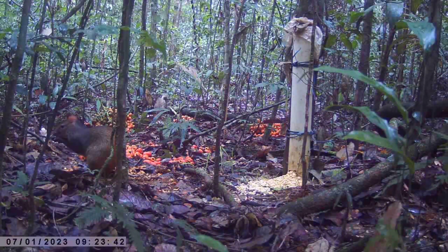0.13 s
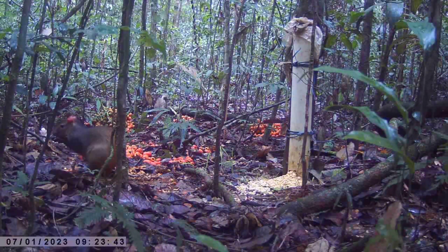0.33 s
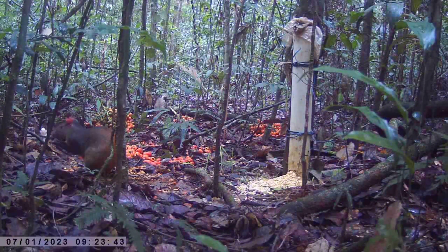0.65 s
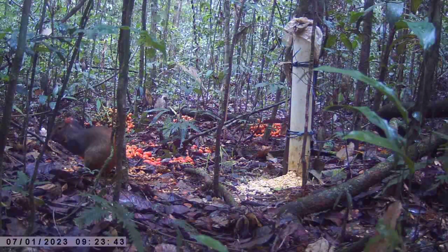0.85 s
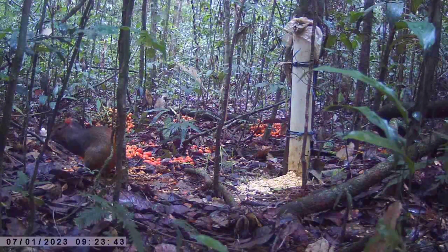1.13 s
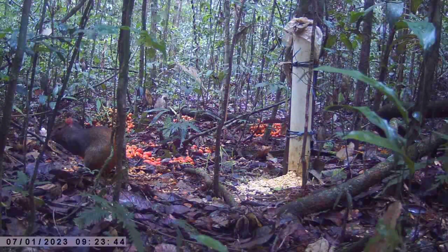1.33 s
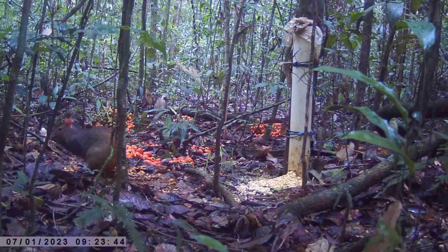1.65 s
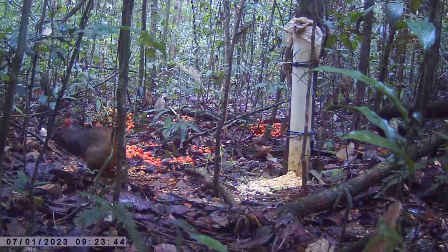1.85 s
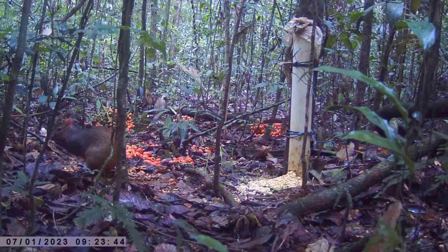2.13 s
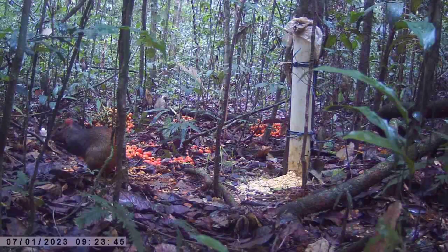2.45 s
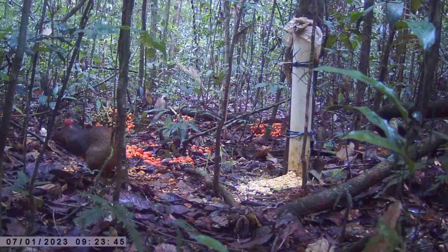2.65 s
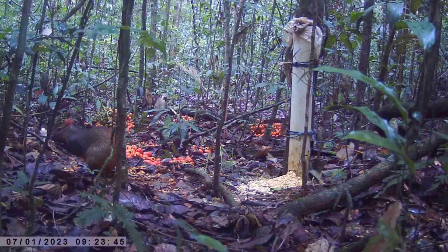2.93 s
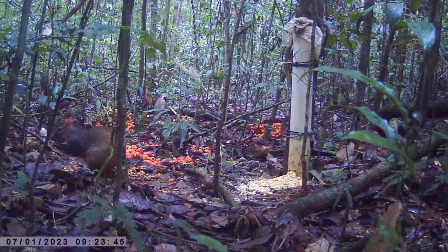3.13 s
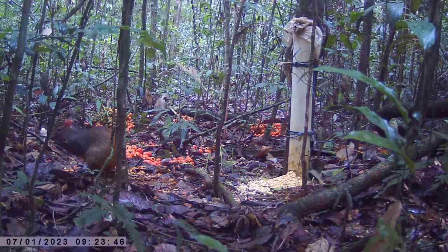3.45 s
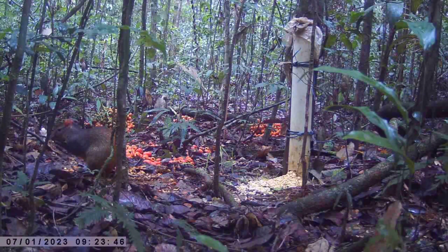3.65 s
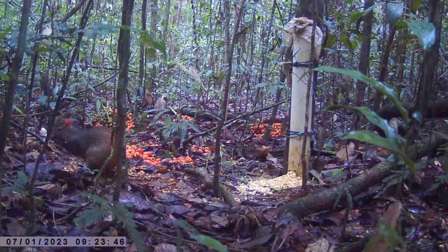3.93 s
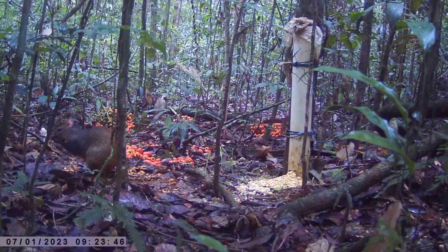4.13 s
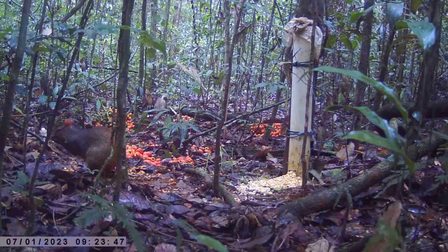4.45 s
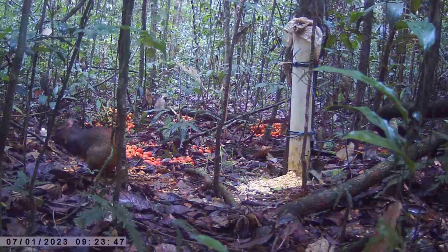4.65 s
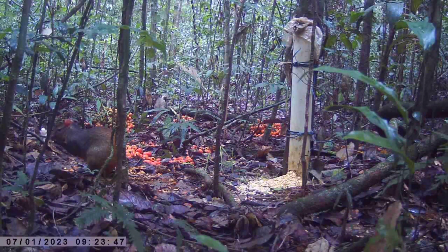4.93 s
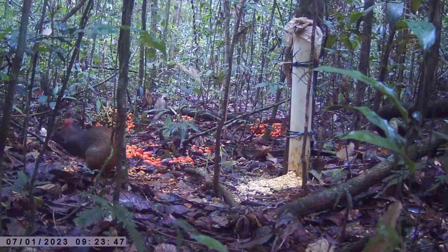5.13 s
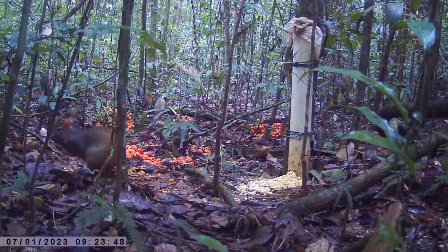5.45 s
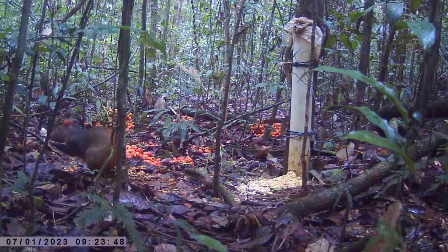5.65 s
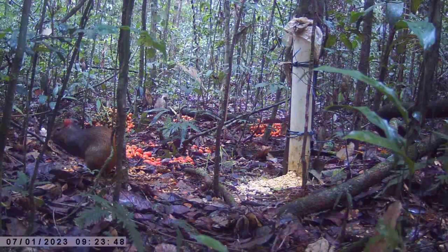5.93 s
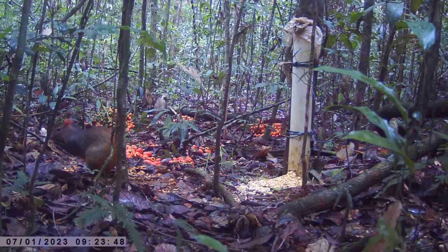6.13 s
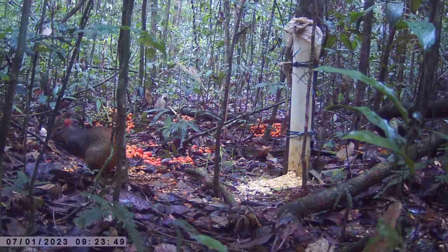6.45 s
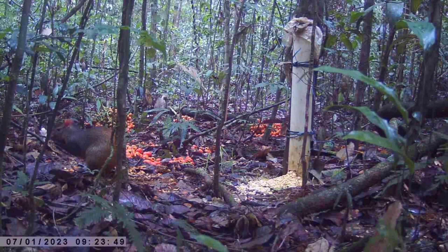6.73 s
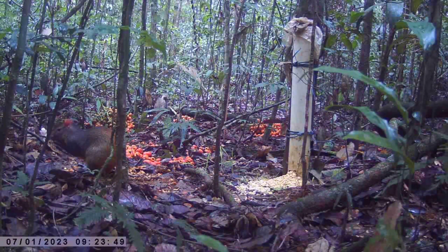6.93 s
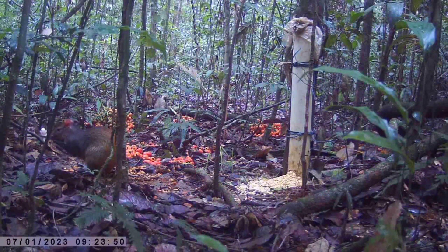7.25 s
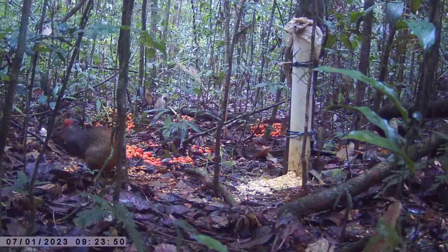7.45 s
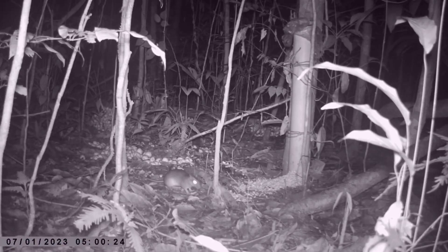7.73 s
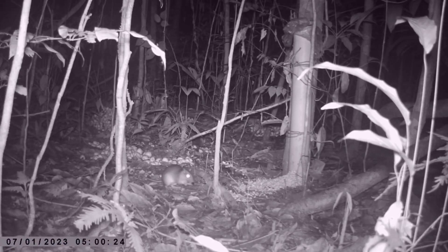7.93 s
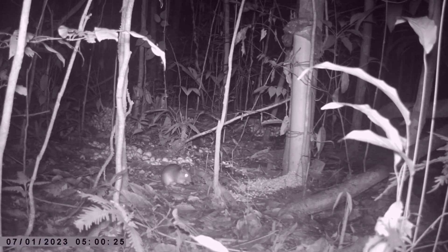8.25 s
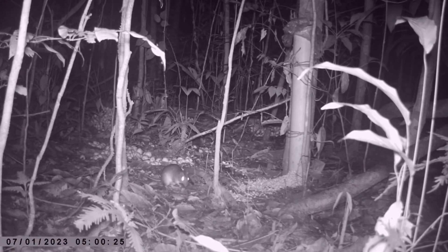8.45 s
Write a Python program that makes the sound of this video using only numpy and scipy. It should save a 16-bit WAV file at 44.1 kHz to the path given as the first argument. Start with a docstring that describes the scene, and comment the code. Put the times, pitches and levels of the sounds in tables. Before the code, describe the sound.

A close cricket chirps in a high, even pulse, about three times a second, on a rainforest floor. Behind it, birds give echoing whistles that rise and plunge, drops tick on dead leaves, and distant insects shimmer over a faint hiss. Near the end the microphone clicks with a soft thump, and the sound cuts to a quieter night trill with one cricket pipping.

```python
"""A near cricket chirps three times a second on a rainforest floor, scraping one wing along the other.
Birds sweep long whistles through the echoing trees, drops tick on dead leaves, and far insects merge
into a chorus over a faint hiss of air. Then night cuts in: the microphone starts with a soft thump,
and a steady insect trill surrounds one pulsing cricket. Both channels are alike."""
import sys
import numpy as np
from scipy import signal
from scipy.fft import rfft, irfft, next_fast_len
from scipy.io import wavfile
from scipy.ndimage import uniform_filter1d

SR = 44100
rng = np.random.default_rng(int(sys.argv[2]) if len(sys.argv) > 2 else 0)


def dump_mix(stems):
    """Bounce the given channels to the path in sys.argv[1] as a 16-bit WAV at rate SR."""
    frames = np.atleast_2d(stems).T  # one column per channel
    limited = np.clip(frames, -1, 1)  # hard clip at full scale
    pcm = np.round(limited * 32767).astype(np.int16)
    wavfile.write(sys.argv[1], SR, pcm)


N = 379337
TIME = np.arange(N) / SR
NIGHT_S = 7.618


def near_cricket(level_db=-30.5, uneven_db=.55, octave_db=-31.5, chirp_gap_s=.3092, stroke_gap_s=.02385):
    """Stridulation: in each wing stroke a scraper slows along a file, so the tone falls."""
    # one stroke: t/ms from its peak, f/Hz, relative amplitude
    stroke = [(-7, 7100, 0), (-5.4, 6920, .42), (-3, 6700, .46), (-1.2, 6590, .78), (.3, 6450, 1),
              (1.5, 6320, .6), (2.2, 6240, .52), (3.5, 6200, 0)]
    # runs in strict time: t/s of the first peak, chirps, strokes per chirp
    runs = [(.005, 4, 6), (1.265, 1, 6), (1.598, 1, 6), (1.929, 7, 6), (4.117, 2, 5), (4.735, 3, 6),
            (5.687, 1, 6), (6.021, 1, 5), (6.330, 5, 6)]
    ms, hz, height = np.transpose(stroke)
    peaks = [s + chirp * chirp_gap_s + k * stroke_gap_s + (k > 0) * .001   # first gap 1 ms longer
             for s, chirps, strokes in runs for chirp in range(chirps) for k in range(strokes)]
    t_ms = np.arange(ms[0], ms[-1], 1000 / SR)
    pitch, envelope = np.full(N, hz[0]), np.zeros(N)
    for s, (late, loud, sharp) in zip(peaks, rng.standard_normal((len(peaks), 3))):
        start = round((s + ms[0] / 1000 + late * .0002) * SR)
        at = np.clip(start + np.arange(len(t_ms)), 0, N - 1)
        pitch[at] = np.interp(t_ms, ms, hz) * (1 + .003 * sharp)
        envelope[at] = np.interp(t_ms, ms, height) * from_db(level_db + uneven_db * loud)
    song = envelope * (tone(pitch) + from_db(octave_db) * tone(2 * pitch))
    return song + from_db(-18) * forest(song, t60=.2)


def sweep(length, low_hz, top_hz, fade_db, half_s, power, edge_s):
    """Frequency glide: pitch and envelope, halfway up after half_s and fading towards the top."""
    t = np.arange(int(length * SR)) / SR
    height = t ** power / (t ** power + half_s ** power)
    edges = np.clip(np.minimum(t, length - t) / edge_s, 0, 1) ** 2
    return low_hz + (top_hz - low_hz) * height, edges * from_db(-fade_db * height ** 4)


def whistles(creep_hz_per_s=1700):
    """Frequency modulation: yields each bird call as (start t/s, level/dB, pitch, envelope)."""
    # shooting up, then creeping higher: start t/s, length/s, top f/Hz before creep, level/dB, fade/dB
    rises = [(1.201, .125, 4240, -47.5, 20), (1.727, .36, 4620, -49, 11), (1.779, 0.14, 4070, -47.5, 42),
             (4.537, .1, 3730, -64, 22), (5.119, .06, 2910, -69, 25)]
    # tipping over and plunging: end t/s, length/s, top f/Hz, level/dB, fade/dB
    falls = [(2.251, .19, 4950, -45.5, 29), (2.729, .34, 5480, -48.5, 18), (5.582, .07, 4800, -66, 19)]
    # soft notes that swell once: middle t/s, length/s, first f/Hz, last f/Hz, level/dB
    notes = [(0.399, 0.121, 1565, 1533, -66.5), (.42, .12, 1230, 1087, -74), (0.622, 0.13, 1012, 977, -80),
             (0.719, 0.084, 1598, 1554, -68.5), (1.349, .11, 1340, 1210, -71),
             (1.554, 0.13, 1150, 1072, -73.5), (2.257, 0.037, 1773, 1643, -53),
             (2.413, .11, 1620, 1630, -52.5), (2.744, .05, 1800, 1700, -54.5), (2.96, .16, 1695, 1661, -61),
             (4.323, .3, 1626, 1578, -80.5), (5.78, 0.11, 1695, 1606, -69)]
    for s, length, top_hz, db, fade_db in rises:
        pitch, envelope = sweep(length, 1430, top_hz, fade_db, half_s=.039, power=2.4, edge_s=.022)
        yield s, db, pitch + creep_hz_per_s * np.arange(len(pitch)) / SR, envelope
    for s, length, top_hz, db, fade_db in falls:
        pitch, envelope = sweep(length, 1727, top_hz, fade_db, half_s=.055, power=1.05, edge_s=.0031)
        yield s - length, db, pitch[::-1], envelope[::-1]
    for s, length, first_hz, last_hz, db in notes:
        along = np.linspace(0, 1, int(length * SR))
        yield s - length / 2, db, first_hz + (last_hz - first_hz) * along, np.sin(np.pi * along)


def birds(direct_db=1.0, echo_db=5.5, flutter_db=1.5):
    """Multipath propagation: the forest smears nearly pure, fast sweeps into a rasping wash."""
    # a whistle's strength at each pitch: f/Hz, relative level/dB
    response = [(1400, -2), (1650, -0.5), (2100, -2), (2800, -2.5), (3500, 0.5), (4200, -1.5), (5200, 1)]
    song, straight = np.zeros((2, N))
    wobble, flutter = 1 + .0025 * drift(60), flutter_db * drift(90)
    for s, db, pitch, envelope in whistles():
        at = int(s * SR) + np.arange(len(pitch))
        colour = np.interp(pitch, *np.transpose(response))
        whistle = envelope * from_db(db + colour + flutter[at]) * tone(pitch * wobble[at])
        song[at] += whistle
        straight[at] += whistle * from_db(-.15 * (db + 54))   # louder calls have a smaller direct share
    direct = band(straight, 500, 3700)   # foliage dulls the straight path
    return from_db(direct_db) * direct + from_db(echo_db) * forest(song, t60=1.2)


def leaf_ticks(times, levels_db, low_hz, high_hz, scatter_db, scatter_s, skirt_db):
    """Impulse response: a tap and a sparse crackle of litter ring each leaf at its own pitch."""
    t = np.arange(SR // 12) / SR
    ticks = np.zeros(N)
    for s, db in zip(times, levels_db):
        crackle = rng.standard_normal(len(t)) ** 3 * np.exp(-t / scatter_s)
        tap = from_db(scatter_db) * crackle / np.linalg.norm(crackle)
        tap[0] += 1
        tuning = rng.uniform(.88, 1.04)
        ring = band(tap, low_hz * tuning, high_hz * tuning, order=3)
        skirt = from_db(skirt_db) * band(tap, low_hz / 2, high_hz, order=1)
        at = round((s + .001) * SR)
        ticks[at:at + len(t)] += from_db(db) * (ring + skirt)
    return ticks


def drops(body_db=19, splash_db=21):
    """Impact excitation: each drop knocks a dry leaf and makes a bright splash."""
    # drops landing: t/s, relative body level/dB, relative splash level/dB
    impacts = [(0.2411, -26.5, -39.5), (0.248, -32.5, -45), (0.4244, -35, -49), (0.4419, -40, -36.5),
               (1.0652, -35, -51), (1.2978, -29.5, -41), (1.7352, -32.5, -38), (2.0916, -37, -37.5),
               (2.3343, -28, -40), (2.6797, -31, -40.5), (2.8624, -36, -38.5), (2.9519, -27.5, -36.5),
               (3.716, -34.5, -48), (3.926, -28, -41), (4.1104, -37, -43), (4.286, -39.5, -41.5),
               (4.6417, -42.5, -50), (4.8334, -36, -46.5), (5.1921, -31.5, -43), (5.225, -27, -41.5),
               (5.386, -35, -51), (5.4173, -32.5, -43), (5.455, -31, -38.5), (5.9, -33.5, -35.5),
               (6.1739, -33.5, -37.5), (6.3739, -35.5, -43), (6.7048, -40, -44), (6.7252, -36.5, -37),
               (6.8982, -39, -41.5), (7.2167, -31.5, -52), (7.2452, -30.5, -48), (7.4095, -38, -38),
               (7.4184, -37, -43), (7.4325, -31, -33.5)]
    s, body, splash = np.transpose(impacts)
    knock = leaf_ticks(s, body + body_db, 3750, 6000, scatter_db=-6, scatter_s=.015, skirt_db=-13.5)
    spray = leaf_ticks(s, splash + splash_db, 9300, 12040, scatter_db=-2, scatter_s=.013, skirt_db=-33)
    return knock + spray


def chorus(centre_hz, spread_hz, sweep_hz, strokes_per_s, direct_db, count=8):
    """Incoherent sum: far crickets, each at its own pitch and pace, blurred by trees; steady rms 1."""
    song = np.zeros(N)
    for place in np.linspace(-1, 1, count):
        stroke = (rng.random() + np.cumsum(strokes_per_s * (1 + .04 * drift(6))) / SR) % 1
        pitch = centre_hz + place * spread_hz + sweep_hz * (.5 - stroke) + 45 * drift(40)
        song += from_db(-5 * place ** 2) * np.sin(np.pi * stroke) ** 4 * tone(pitch)
    song = forest(song, t60=1.0) + from_db(direct_db) * song
    return song / np.sqrt(uniform_filter1d(song ** 2, SR // 8) + 1e-9)


def far_chirps_db(swell_s=.068, fade_s=.066, floor_db=-56):
    """Addition of powers: the joint level of far chirps and a steady floor."""
    # far crickets' chirps: peak t/s, level/dB
    chirps = [(.02, -49.5), (.33, -51), (.69, -49.5), (1.06, -53.5), (1.39, -48.5), (1.83, -50.5),
              (2.04, -54), (2.28, -51), (2.53, -51.5), (2.83, -52.5), (3.2, -51), (3.41, -57), (3.62, -56),
              (3.87, -48.5), (4.14, -51), (4.31, -53.5), (4.49, -49), (4.78, -54), (5.06, -56), (5.29, -53),
              (5.44, -53.5), (5.74, -53), (6.0, -51), (6.4, -52.5), (6.69, -52), (7.05, -53), (7.33, -51)]
    power = from_db(floor_db) ** 2
    for s, db in chirps:
        width = np.where(TIME < s, swell_s, fade_s)
        power = power + from_db(db) ** 2 * np.exp(-np.minimum(((TIME - s) / width) ** 2, 20))
    return 10 * np.log10(power)


def day_insects(high_throb_share=.15):
    """Amplitude modulation: the low chorus swells slowly, the upper two throb with the far chirps."""
    # low chorus, swelling about every two seconds: t/s, level/dB
    low_levels = [(0.0, -60), (0.19, -63), (0.23, -53), (0.82, -53.5), (0.89, -67), (1.75, -53),
                  (2.6, -50.5), (3.06, -59.5), (4.11, -52.5), (4.81, -54.5), (4.92, -63), (5.05, -57),
                  (5.64, -60), (5.93, -53), (6.63, -55.5), (6.69, -52.5), (7.18, -60), (7.26, -54),
                  (7.54, -63), (7.58, -55)]
    # high chorus, slowly thinning out: t/s, level/dB
    high_levels = [(0.0, -60), (0.17, -68), (0.25, -63), (2.07, -57.5), (3.02, -61.5), (4.6, -60.5),
                   (5.53, -66), (7.58, -64)]
    low = chorus(centre_hz=5430, spread_hz=220, sweep_hz=700, strokes_per_s=66, direct_db=-3)
    mid = chorus(centre_hz=6780, spread_hz=400, sweep_hz=1000, strokes_per_s=42, direct_db=-3)
    high = chorus(centre_hz=7560, spread_hz=190, sweep_hz=850, strokes_per_s=46, direct_db=-6)
    low_db, mid_db = in_time(low_levels)[0], far_chirps_db()
    high_db = in_time(high_levels)[0] + high_throb_share * (mid_db - mid_db.mean())
    return low * from_db(low_db) + mid * from_db(mid_db) + high * from_db(high_db)


def night_insects():
    """Superposition: many overlapping wing strokes fuse into two dense trills."""
    # night chorus: t/s, low trill level/dB, high trill level/dB
    levels = [(7.64, -48, -54), (7.818, -46.5, -52), (7.866, -52, -62), (7.892, -49, -53),
              (8.066, -55, -58.5), (8.568, -53, -58.5), (8.58, -53, -56)]
    low_db, high_db = in_time(levels)
    low = chorus(centre_hz=5335, spread_hz=350, sweep_hz=790, strokes_per_s=71, direct_db=1.5)
    high = chorus(centre_hz=6660, spread_hz=150, sweep_hz=450, strokes_per_s=50, direct_db=-5)
    return from_db(low_db) * low + from_db(high_db) * high


def night_cricket(level_db=-56, hum_db=-8, pitch_hz=4607, lag_s=.0077, gap_s=.048, width_s=.007):
    """Pulse modulation: one cricket pips on a pure note that never quite stops."""
    # bursts of pips: start t/s, pulses
    bursts = [(7.6405, 1), (7.7204, 2), (7.8476, 5), (8.1209, 2), (8.2332, 1), (8.296, 3), (8.4736, 3)]
    peaks = [s + lag_s + k * gap_s for s, pulses in bursts for k in range(pulses)]
    envelope = sum(np.exp(-((TIME - s) / width_s) ** 2) for s in peaks)
    envelope += from_db(hum_db) * (1 + .4 * drift(120))
    pips = from_db(level_db) * night_lift() * envelope * tone(pitch_hz + 28 * drift(120))
    return pips + from_db(-7) * forest(pips, t60=.4)


def switch_thump(click_db=-30, thump_db=-40, settle_s=.075):
    """Switching transient: the microphone clicks and thumps as it starts, then settles."""
    age = np.maximum(TIME - NIGHT_S, 0) / settle_s
    surge = age * np.exp(1 - age)
    rumble = rms_one(band(rng.standard_normal(N), 27, 29.8, order=1))
    impulse = 1. * (np.arange(N) == round(NIGHT_S * SR))
    click = signal.lfilter([1], [1, -.7], impulse)
    return from_db(thump_db) * surge * (.26 * rumble - 1) + from_db(click_db) * click


def thin_notes(level_db=-73, pitch_hz=11135, length_s=.12):
    """Frequency jitter roughens the faint, very high notes of a tiny insect."""
    # the notes: middle t/s
    middles = [.41, .7, .955, 1.51, 2.03, 2.255, 2.425, 2.75, 3.255, 3.765, 4.24, 4.755, 5.74, 6.725, 7.26]
    gate = sum(1. * (abs(TIME - s) < length_s / 2) for s in middles)
    return from_db(level_db) * uniform_filter1d(gate, SR // 40) * tone(pitch_hz + 45 * drift(200))


def day_air(level_db=-56):
    """Broadband noise: still air, far leaves and microphone hiss."""
    # noise spectrum: f/Hz, relative density level/dB
    spectrum = [(20, -60.5), (35, -62.5), (60, -68.5), (110, -77.5), (220, -84), (500, -87), (1400, -90.5),
                (3100, -92.5), (4000, -89.5), (5000, -82), (8500, -94), (10200, -93.5), (12200, -93),
                (15500, -97)]
    return from_db(level_db) * coloured_noise(spectrum)


def night_air(level_db=-57):
    """Broadband noise: the night's hiss, with a narrow peak near 7.3 kHz."""
    # noise spectrum: f/Hz, relative density level/dB
    spectrum = [(20, -63), (60, -67), (110, -76), (220, -85), (500, -86), (1400, -90), (4000, -92),
                (6250, -84), (6900, -88), (7300, -76.5), (8200, -94.5), (11000, -93), (15500, -96)]
    return from_db(level_db) * night_lift() * coloured_noise(spectrum)


def night_lift(lift_db=3.5, hold_s=.24, settle_s=.17):
    """Gain envelope: raised as night opens, then sinking to 1."""
    return from_db(lift_db * np.clip(1 - (TIME - NIGHT_S - hold_s) / settle_s, 0, 1))


def forest(x, t60):
    """Reverberation: trunks scatter a sound into a tail of like energy, down 60 dB in t60 seconds."""
    t = np.arange(int(1.5 * SR)) / SR
    echoes = rng.standard_normal(len(t)) * from_db(-60 * t / t60)
    return signal.fftconvolve(x, echoes / np.linalg.norm(echoes))[:N]


def coloured_noise(spectrum):
    """Spectral shaping of white noise; rms 1."""
    hz, db = np.transpose(spectrum)
    size = next_fast_len(N)
    bins = np.maximum(np.fft.rfftfreq(size, 1 / SR), 1)
    gain = from_db(np.interp(np.log(bins), np.log(hz), db))
    return rms_one(irfft(rfft(rng.standard_normal(size)) * gain, size)[:N])


def tone(hz):
    """A sine whose phase is the integral of frequency."""
    return np.sin(2 * np.pi * np.cumsum(hz) / SR)


def band(x, low_hz, high_hz, order=2):
    """Band-pass filter."""
    sos = signal.butter(order, [low_hz, min(high_hz, .45 * SR)], "band", fs=SR, output="sos")
    return signal.sosfilt(sos, x + 1e-18)


def drift(rate_hz):
    """Random fluctuation with a spread of about 1."""
    return np.interp(TIME * rate_hz, np.arange(4000), rng.standard_normal(4000))


def in_time(rows):
    """Linear interpolation of each column to every sample."""
    s, *columns = np.transpose(rows)
    return [np.interp(TIME, s, c) for c in columns]


def from_db(db):
    """Level to amplitude ratio."""
    return 10 ** (np.asarray(db) / 20)


def rms_one(x):
    """Normalisation to rms 1."""
    return x / np.sqrt(np.mean(x ** 2) + 1e-20)


def scene():
    """Superposition of the day's sources, then a sudden cut to the night's."""
    day = near_cricket() + day_insects() + thin_notes() + birds() + drops() + day_air()
    night = night_insects() + night_cricket() + night_air() + switch_thump()
    return np.tile(np.where(TIME < NIGHT_S, day, night), (2, 1))


def record(dry):
    """Band limiting: a steep low-pass at 15.65 kHz."""
    return signal.sosfilt(signal.ellip(12, .1, 70, 15650, fs=SR, output="sos"), dry)


dry = scene()
out = record(dry)
dump_mix(out)
```